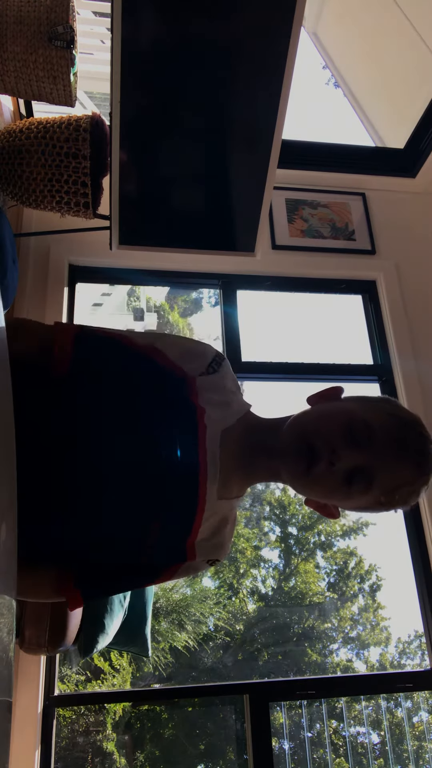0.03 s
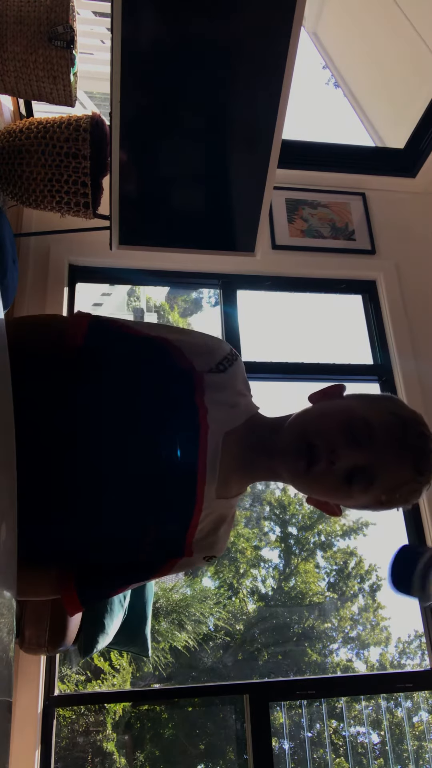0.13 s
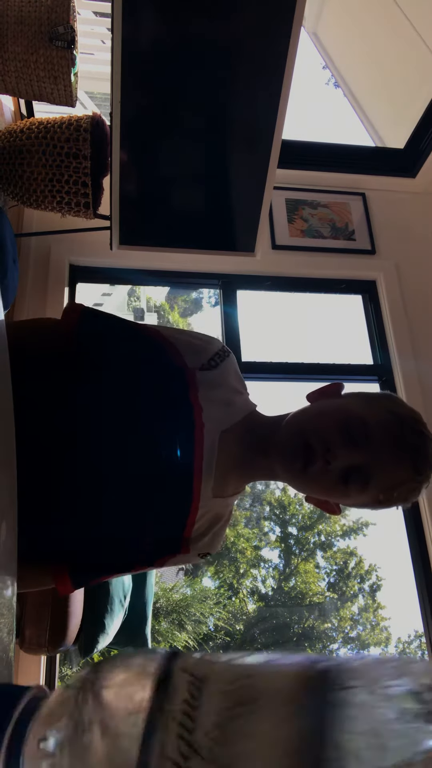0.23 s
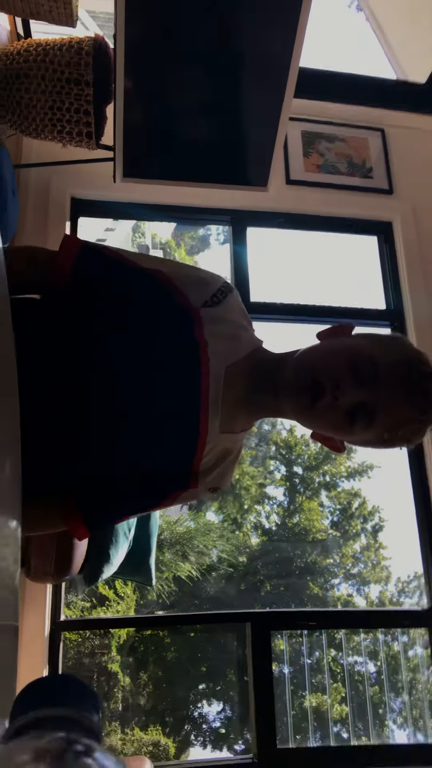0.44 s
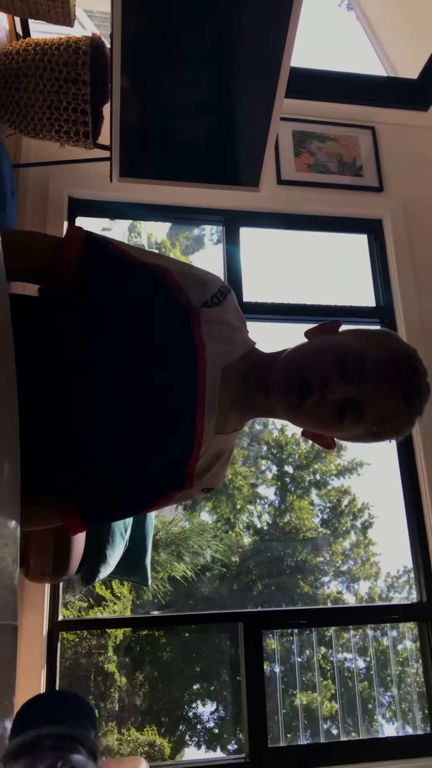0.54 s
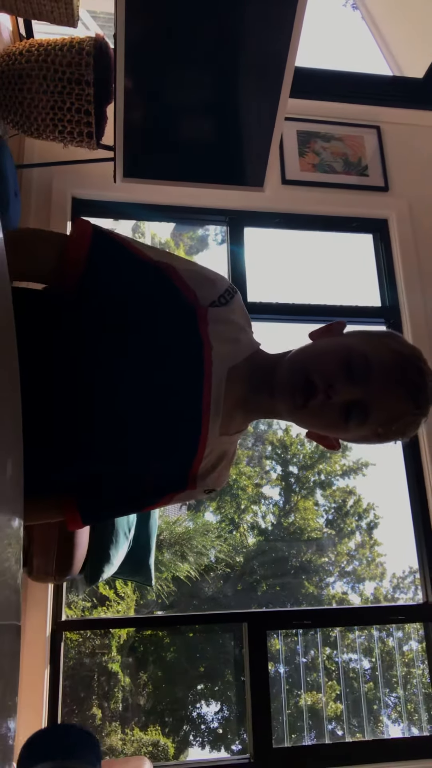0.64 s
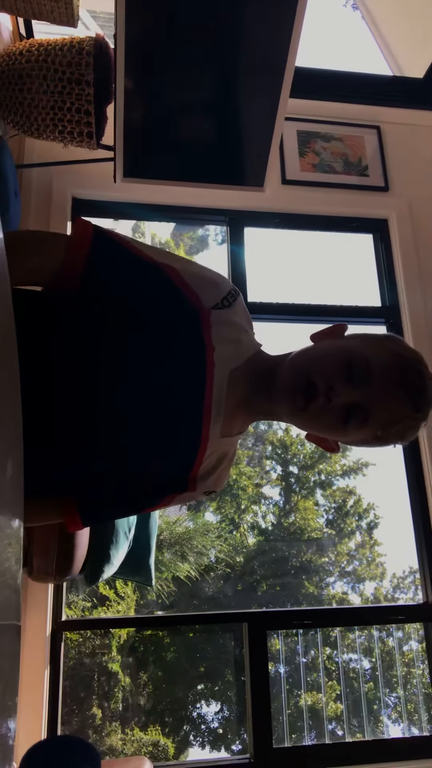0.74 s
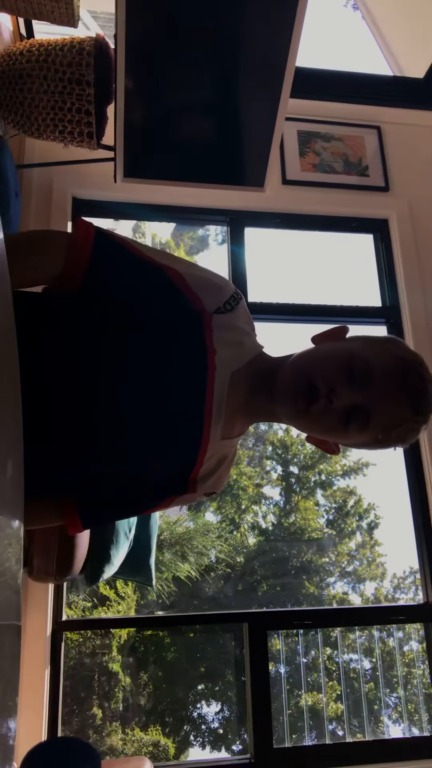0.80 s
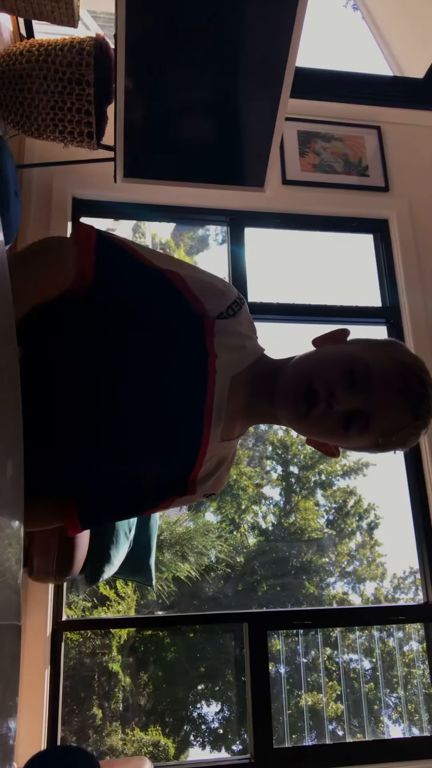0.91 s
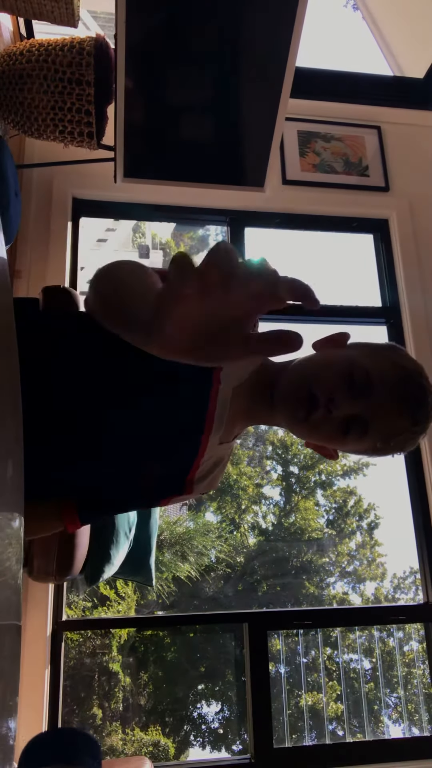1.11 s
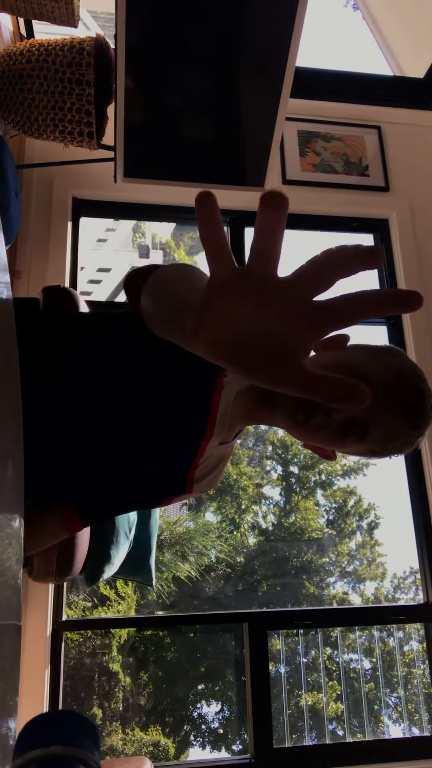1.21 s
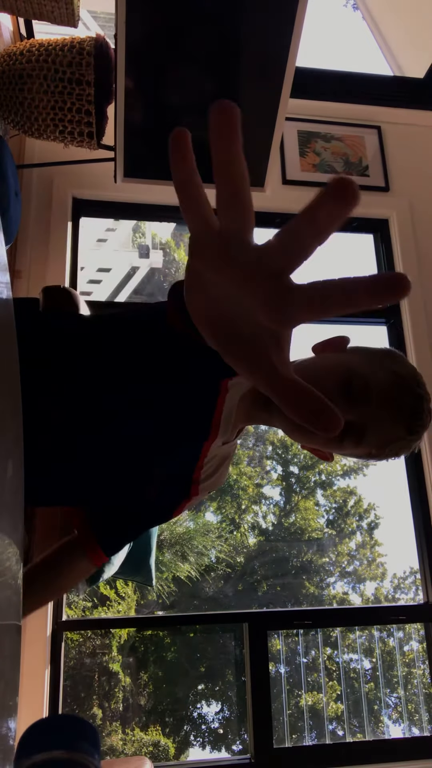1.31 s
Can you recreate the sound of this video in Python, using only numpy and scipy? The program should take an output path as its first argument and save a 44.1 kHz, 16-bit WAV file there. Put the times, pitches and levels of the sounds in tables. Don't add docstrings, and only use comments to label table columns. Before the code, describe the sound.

Soft cloth rustle fades, then a thin plastic bottle hits a tabletop sharply, with a short rising water gulp, a second lighter clatter and small ticks, heard close up in a lightly echoing living room.

```python
import sys
import numpy as np
from scipy import signal
from scipy.fft import rfft, irfft
from scipy.io import wavfile
from scipy.ndimage import uniform_filter1d

SR = 44100
rng = np.random.default_rng(int(sys.argv[2]) if len(sys.argv) > 2 else 0)


def master_out(mix):
    frames = np.transpose(np.atleast_2d(mix))
    ceiling = np.clip(frames, -1, 1)
    pcm = np.round(ceiling * 32767).astype(np.int16)
    wavfile.write(sys.argv[1], SR, pcm)


def volts_from_decibels(level):
    exponent = np.asarray(level, float) / 20
    return 10 ** exponent


N = 59535

# pitch_hz, density_db
TOSS_SPECTRUM = [(24, -35), (40, 5), (185, 2.5), (896, -6.5), (1520, -5), (2380, -17.5), (3740, -10.5),
                 (16000, -35.5)]
# pitch_hz, density_db
HUM_SPECTRUM = [(15, -45), (25, -11.5), (66, -3.5), (153, -16.5), (175, -19), (200, -19), (285, -20.5),
                (911, -24.5), (9000, -47), (16000, -49)]
# start_s, peak_db,
# pitch_hz, t60_s
WALL_SNAPS = [(.004, -43.5, 9800, .003), (.009, -37.5, 5180, .006), (0.03, -31.5, 3650, .006),
              (.034, -32, 5640, .005), (0.039, -45.5, 9300, .003), (.117, -49, 11500, .003),
              (0.1202, -38.5, 6380, .003), (0.2274, -37.5, 6360, .002), (.2385, -42, 6300, .002),
              (0.2493, 1.5, 6320, 0.0015), (0.267, -23.5, 6500, .002), (0.2736, -3, 6060, .0025),
              (.290, -14, 6074, .0025), (0.298, -27.5, 5660, .003), (0.3834, -31, 5600, 0.0026),
              (0.3936, -28.5, 12400, 0.0011), (0.3996, -22.5, 6060, .0015), (.3835, -37, 12800, .001),
              (.4075, -32.5, 5600, 0.0044), (0.416, -19, 6490, 0.0026), (.4183, -13, 11850, 0.00071),
              (.464, -37, 7560, .003), (.510, -34.5, 4000, 0.004), (0.585, -36, 5010, 0.0072),
              (0.587, -38.5, 3270, 0.0051), (.668, -43, 6830, 0.0049), (.829, -56, 5730, 0.01),
              (1.007, -57, 5394, 0.01), (1.059, -61, 5870, 0.014), (1.099, -61, 6000, 0.011),
              (.320, -32, 2930, .005), (.332, -50.5, 11600, .002), (0.367, -42, 2900, 0.003),
              (.368, -37, 5030, 0.0027), (0.383, -36, 4000, 0.0046), (.4195, -21.5, 4000, 0.0067),
              (0.4373, -36, 4000, 0.0044), (0.437, -49, 12500, .002), (.456, -35, 3100, 0.0058),
              (0.519, -56, 12500, 0.0033), (0.161, -52.5, 2540, .012), (.139, -53, 5100, .004),
              (.126, -54, 11800, .003), (0.013, -40.5, 6800, .005), (1.024, -70, 3490, 0.0039)]
# start_s, level_db, contact_s, scrape_s
SIDE_KNOCKS = [(.030, -34, 0.000019, 0.004), (.4155, -11.5, 0.00005, 0.0023),
               (.4185, -12, 0.000036, 0.0055), (.428, -21.5, 0.000061, 0.0032),
               (.441, -21.5, 0.00015, 0.0017), (.452, -30, 0.00013, 0.0018), (.459, -24, .0005, 0.0012),
               (.503, -29.5, 0.000067, 0.0033), (.599, -31, 0.00012, 0.0018),
               (.613, -48.5, 0.00036, 0.0044), (.992, -52, .0002, 0.012), (1.006, -40.5, 0.000083, 0.0021),
               (1.012, -37, 0.00023, 0.0023), (1.023, -42.5, 0.00013, 0.0046)]
# start_s,
# level_db, contact_s, scrape_s
BASE_KNOCKS = [(0.228, -31, 0.00034, 0.015), (0.2497, 1, 0.00015, 0.0045), (.2565, -3.5, 0.00013, .004),
               (.264, -9, .0001, 0.0037), (.275, -9, .0001, 0.0016), (0.3932, -8, 0.00047, .0006),
               (.3945, -20, 0.000019, 0.0046), (.431, -15.5, 0.000354, 0.0067),
               (0.51, -28, 0.00017, 0.0044), (1.027, -40.5, 0.00054, 0.0048), (1.041, -42, 0.00071, 0.0074)]
# pitch_hz, level_db, t60_s
SIDE_RINGS = [(306.2, -3.5, 0.013), (484, -3.5, 0.021), (714, -6.5, 0.0087), (1000, -5, 0.039),
              (1260, -0.5, 0.018), (1562, -1, 0.01), (1997, -2.5, 0.0078), (2662, -7.5, 0.016),
              (3120, -11.5, 0.085), (4000, -9, 0.015), (5800, -20, 0.024), (8040, -15.5, .01),
              (11800, -18.5, .008)]
# pitch_hz, level_db, t60_s
BASE_RINGS = [(233, -14.5, .07), (276.5, -5, 0.019), (356.7, -8.5, .035), (628, -2, 0.047), (672, -5, 0.05),
              (781.3, 0.5, .035), (990, -3.5, 0.038), (1103, -1, .03), (1320, -3.5, 0.027),
              (1673, -9, 0.093), (2030, -2.5, .025), (2300, -9.5, .02), (2726, -9, 0.032), (3700, -9, .025)]
# start_s, pitch_hz, level_db
AIR_POCKET = [
    (0.227, 419.8, -48.5),
    (0.25, 424.6, -18),
    (0.25, 321, -6.5),
    (0.262, 398.7, -11),
    (0.271, 448.7, -22.5),
    (0.2759, 489.5, -6),
    (0.293, 525.4, -20),
    (0.295, 526, -8.5),
    (0.314, 577, -37.5),
]
# start_s,
# level_db, pitch_hz, t60_s
WALL_PANELS = [(.229, -41.5, 1600, 0.017), (.237, -33.5, 890, 0.018), (.2497, -13, 1373, 0.026),
               (.2497, -22, 2600, 0.077), (.2505, -25.5, 4416, 0.023), (.252, -14, 1980, 0.036),
               (.2565, -8, 924, 0.034), (.2605, -24, 3700, 0.018), (.263, -18.5, 1632, .05),
               (.270, -24, 2619, 0.021), (.284, -23, 1519, 0.023), (.310, -23, 857, 0.023),
               (.397, -19.5, 926, 0.024), (.4155, -13, 1238, 0.014), (.416, -19, 2084, 0.011),
               (.4175, -20.5, 3014, .015), (.420, -19, 1489, 0.023), (.4215, -16.5, 702, 0.014),
               (.427, -19.5, 1044, 0.06), (.4295, -16.5, 497, .025), (.449, -24.5, 521, 0.034),
               (.512, -35.5, 787, 0.028), (.599, -31, 1000, 0.024), (1.006, -52, 1400, 0.017),
               (1.011, -42, 918, 0.028), (1.024, -51.5, 1799, .015), (1.026, -46.5, 1201, 0.014),
               (.994, -53, 1351, .025), (.997, -52, 750, .015), (.2555, -17.5, 2102, .025),
               (0.2539, -19.5, 3290, .02), (.258, -17.5, 1353, 0.033), (.279, -30.5, 3501, .03),
               (.291, -30.5, 4294, .02), (.296, -30, 2180, .03), (0.39, -28, 1685, .012),
               (0.4171, -25, 4282, .012), (.433, -30.5, 2230, .02), (.229, -36.5, 495, 0.036),
               (.295, -27.5, 200.1, .08), (.400, -32, 125, .06)]
# start_s, level_db, pitch_hz, t60_s
TABLE_THUMPS = [(0.249, -17.5, 57.6, 0.088), (.398, -27, 72.25, 0.1), (0.447, -34.5, 124, 0.075),
                (.474, -31.5, 104.4, 0.06), (.525, -55, 57, 0.4), (0.616, -40, 105.7, 0.11),
                (.611, -44, 185, 0.045), (0.687, -46, 69.4, 0.077), (1.027, -41.5, 68.9, 0.16),
                (1.032, -56, 125, 0.09), (1.234, -52.5, 78, 0.35), (0.66, -46.5, 366, 0.23),
                (0.70, -44, 379, 0.092), (0.731, -54.5, 360, 0.12), (0.769, -56, 385, 0.1),
                (1.12, -54.5, 357.7, 0.13), (1.33, -46.5, 61, 0.22)]
# pitch_hz, t60_s, level_db
ROOM_BANDS = [(88.14, 0.44, -42), (190, 0.6, -36.5), (374.6, 0.76, -19.5), (727, 0.73, -17.5),
              (1320, 0.97, -18.5), (2593, 1, -23.5), (3900, 0.76, -22), (5600, 0.89, -21),
              (7810, .65, -18.5), (10500, 0.6, -10), (14500, 0.8, -15)]


def band(x, hz, octaves):
    edges = hz * 2 ** (np.array([-.5, .5]) * octaves)
    sos = signal.butter(2, np.minimum(edges, .45 * SR), "band", fs=SR, output="sos")
    return signal.sosfilt(sos, x)


def add(out, start_s, x):
    i = max(int(start_s * SR), 0)
    out[i:i + len(x)] += x[:len(out) - i]


def at_peak(x, db):
    return volts_from_decibels(db) * x / np.abs(x).max()


def ring(hz, t60_s, rise_s):
    t = np.arange(int(1.5 * t60_s * SR) + 8) / SR
    return np.sin(2 * np.pi * hz * t) * volts_from_decibels(-60 * t / t60_s) * (1 - np.exp(-t / rise_s))


def colour(spectrum):
    points = np.array(spectrum)
    f = np.arange(N // 2 + 1) * SR / N + 1
    gain = volts_from_decibels(np.interp(np.log(f), np.log(points[:, 0]), points[:, 1]))
    x = irfft(rfft(rng.standard_normal(N)) * gain, N)
    return x / x.std()


def background():
    t = np.arange(N) / SR
    toss_db, toss_t60_s = -42.5, .55
    hum_db, flicker_db = -57.5, 0.53
    flicker = uniform_filter1d(rng.standard_normal(N), 2000) * np.sqrt(2000)
    rustle = volts_from_decibels(toss_db - 60 * t / toss_t60_s) * colour(TOSS_SPECTRUM)
    hum = volts_from_decibels(hum_db + flicker_db * flicker) * colour(HUM_SPECTRUM)
    return rustle + hum


def snaps():
    rise_s, edge_s, edge_db = 0.00069, 0.00041, -25
    out, t = np.zeros(N), np.arange(128) / SR
    edge_shape = np.exp(-t / edge_s) * t / edge_s
    for start_s, db, hz, t60_s in WALL_SNAPS:
        partner_hz = min(1.17 * hz, 16000)
        tone = ring(hz, t60_s, rise_s) + 0.32 * ring(partner_hz, t60_s, rise_s)
        tone = band(tone, 1.25 * hz, 1.0)
        edge = band(rng.standard_normal(128) * edge_shape, min(1.55 * hz, 13000), 1.2)
        add(out, start_s, at_peak(tone, db))
        add(out, start_s, volts_from_decibels(db + edge_db) * edge * 5)
    return out


def struck_body(modes):
    body = np.zeros(SR // 4)
    shifts = rng.standard_normal((len(modes), 2))
    for k, ((hz, db, t60_s), (detune, lift)) in enumerate(zip(modes, shifts)):
        sign = (-1) ** (k // 3)
        tone = ring(hz * (1 + 0.026 * detune), t60_s, .0001)
        add(body, 0, sign * volts_from_decibels(db + 0.79 * lift) * tone)
    return body


def knocks(hits, modes):
    crunch_db, crunch_hz, hiss_db = -9.5, 1900, -16
    rings, crunch, t = np.zeros(N), np.zeros(N), np.arange(2000) / SR
    for start_s, db, contact_s, scrape_s in hits:
        body = struck_body(modes)
        fade = np.exp(-t / scrape_s)
        push = rng.standard_normal(2000) * fade / np.sqrt(scrape_s * SR)
        push[0] += .5
        soft = np.exp(-t / contact_s) * t / contact_s
        force = signal.fftconvolve(push, soft / soft.sum())
        add(rings, start_s, at_peak(signal.fftconvolve(force, body), db))
        hardness = .0001 / contact_s
        hiss = rng.standard_normal(2000)
        grit = 2 * band(hiss, crunch_hz * hardness ** 0.22, 2.23) + volts_from_decibels(hiss_db) * hiss
        add(crunch, start_s, volts_from_decibels(db + crunch_db) * min(1, hardness) * grit * fade)
    return np.array([rings, crunch])


def glug():
    t = np.arange(N) / SR
    start_s, pitch_hz, level_db = np.array(AIR_POCKET).T
    phase = 2 * np.pi * np.cumsum(np.interp(t, start_s, pitch_hz)) / SR
    return np.sqrt(2) * volts_from_decibels(np.interp(t, start_s, level_db, -200, -200)) * np.sin(phase)


def whine():
    pitch_hz, end_db, rise_db_per_s, end_s = 8120, -38, 1204, .2492
    t = np.arange(N) / SR - end_s
    sounding = (t < 0) * (t > -.021)
    return sounding * volts_from_decibels(end_db + rise_db_per_s * np.minimum(t, 0)) * np.sin(2 * np.pi * pitch_hz * t)


def ring_events(events, rise_s):
    out = np.zeros(N)
    for start_s, db, hz, t60_s in events:
        add(out, start_s, at_peak(ring(hz, t60_s, rise_s), db))
    return out


def panels():
    return ring_events(WALL_PANELS, rise_s=0.00023)


def thumps():
    return ring_events(TABLE_THUMPS, rise_s=0.002)


def trickle():
    level_db, t60_s, bubbles_per_s = -31.5, 0.35, 1800
    low_hz, high_hz = 278, 4700
    landing_s = BASE_KNOCKS[1][0]
    out = np.zeros(N)
    for when, size, luck in rng.random((500, 3)):
        after_s = when * 500 / bubbles_per_s
        hz = low_hz * (high_hz / low_hz) ** size
        db = level_db - 60 * after_s / t60_s - 4 * np.log(1 - luck) - 14 * size
        add(out, landing_s + after_s, volts_from_decibels(db) * ring(hz, 9 / hz, .4 / hz))
    return out


def room(x):
    t, tail = np.arange(SR) / SR, np.zeros(SR)
    for hz, t60_s, db in ROOM_BANDS:
        noise = band(rng.standard_normal(SR), hz, 0.9)
        tail += noise * volts_from_decibels(db - 60 * t / t60_s) / np.sqrt(t60_s * hz)
    tail *= 1 - np.exp(-t / .004)
    return np.sqrt(10) * signal.fftconvolve(x, tail)[:N]


def scene():
    pops, air, water = snaps(), glug(), trickle()
    rings, crunch = knocks(BASE_KNOCKS, BASE_RINGS) + knocks(SIDE_KNOCKS, SIDE_RINGS)
    rings = rings + panels()
    sent = crunch + water + volts_from_decibels(-11.5) * rings + volts_from_decibels(-16) * air + volts_from_decibels(-11.5) * pops
    near = pops + air + water + rings + crunch + thumps() + whine()
    return (near + room(sent) + background())[None]


def roll_off(x):
    return signal.sosfilt(signal.butter(12, 16430, fs=SR, output="sos"), x)


def record(dry):
    low_hz, top_hz, clip_at = 70, 15750, 1.05
    x = signal.sosfilt(signal.butter(2, low_hz, "high", fs=SR, output="sos"), dry)
    x = signal.sosfilt(signal.ellip(8, .2, 60, top_hz, fs=SR, output="sos"), x)
    return roll_off(clip_at * np.tanh(x / clip_at))


dry = scene()
out = record(dry)
master_out(out)
```